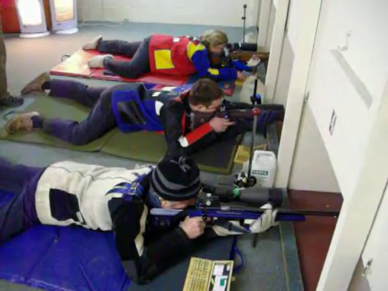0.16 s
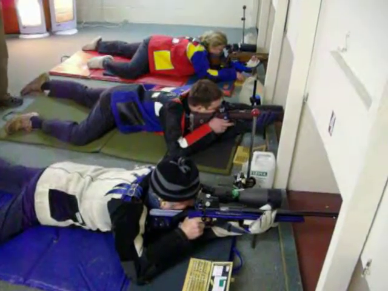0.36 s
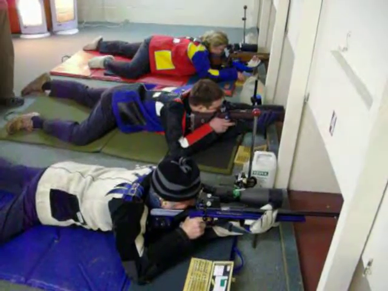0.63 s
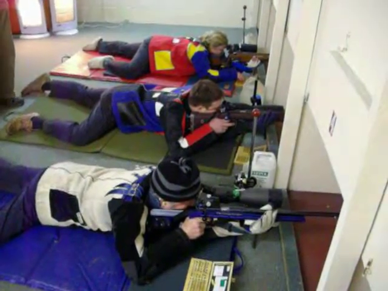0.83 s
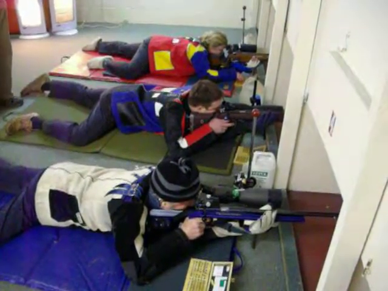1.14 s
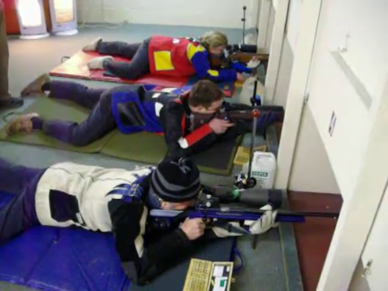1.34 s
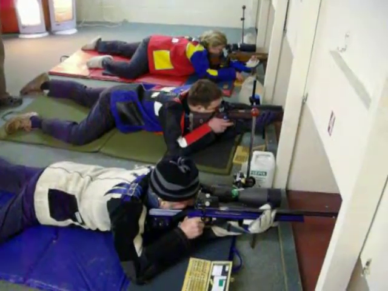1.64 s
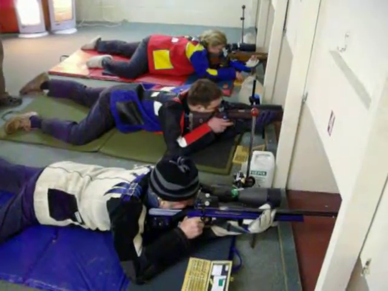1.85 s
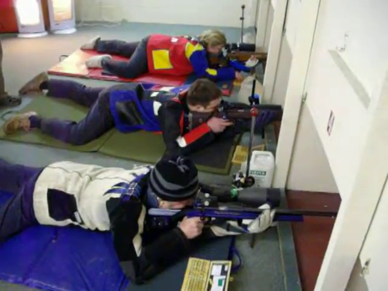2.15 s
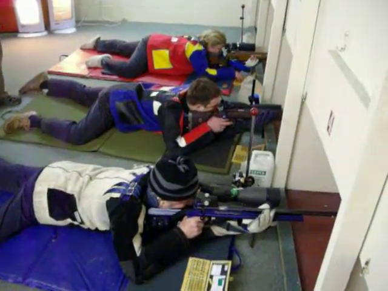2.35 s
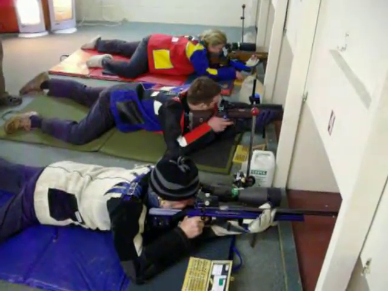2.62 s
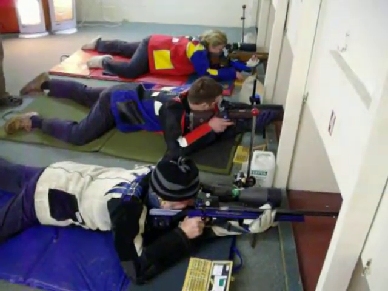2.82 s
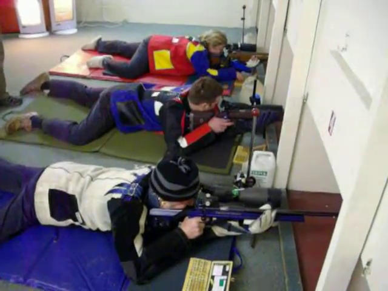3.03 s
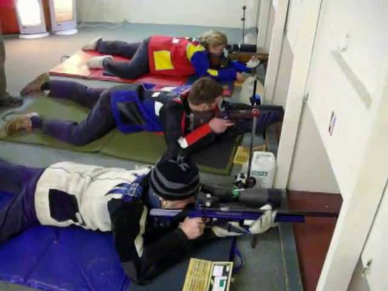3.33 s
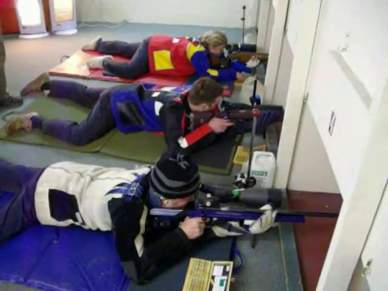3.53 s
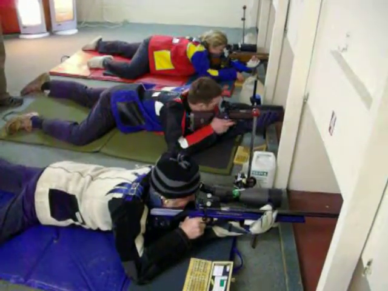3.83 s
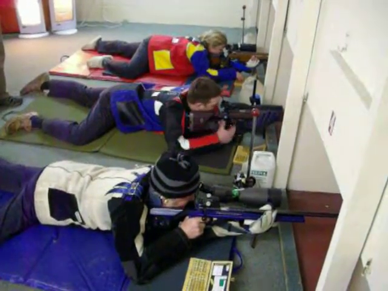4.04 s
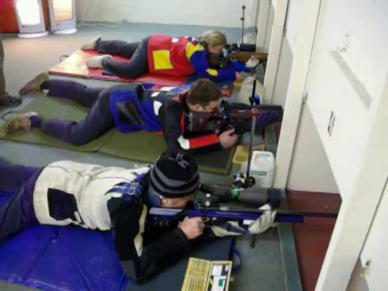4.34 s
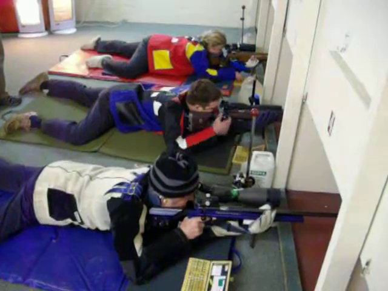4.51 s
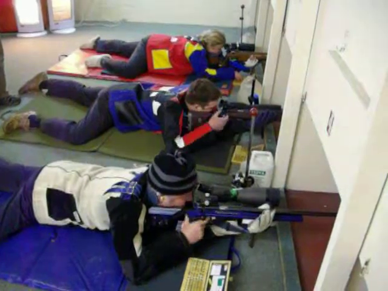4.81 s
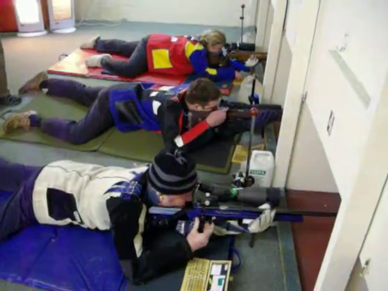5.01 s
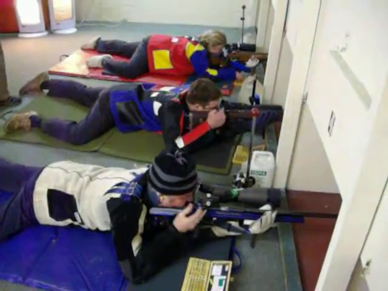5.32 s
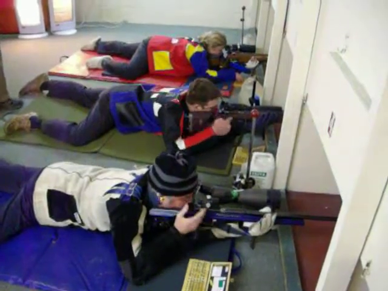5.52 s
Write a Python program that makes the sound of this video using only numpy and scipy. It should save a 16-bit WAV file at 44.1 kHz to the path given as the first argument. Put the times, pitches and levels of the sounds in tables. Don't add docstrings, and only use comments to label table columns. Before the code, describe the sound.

Two small-calibre rifle shots, each a hard crack with a long indoor echo held up by the recorder's automatic level, come roughly two seconds apart. Low ventilation noise, wavering hum and a steady high whine fill the gaps. Near the end, light metal clicks, a short bolt rattle with a dull thump, and a final bright latch snap sound close by, with a short booth reverberation.

```python
import sys
import numpy as np
from scipy import signal
from scipy.fft import rfft, irfft
from scipy.io import wavfile
from scipy.ndimage import uniform_filter1d

SR = 44100
rng = np.random.default_rng(int(sys.argv[2]) if len(sys.argv) > 2 else 0)


def voltage_ratio(decibels):
    exponent = np.asarray(decibels, float) / 20
    return 10 ** exponent


def unload_audio(sound):
    columns = np.transpose(np.atleast_2d(sound))
    steps = np.round(np.clip(columns, -1, 1) * 32767)
    wavfile.write(sys.argv[1], SR, steps.astype(np.int16))


N = 249910

# pitch_hz, level_db (per Hz)
AIR_COLOUR = [(8.8, -42), (15, -4.5), (27, -8), (103, -14.5), (125, -15.5), (201, -20), (281, -19.5),
              (393, -17.5), (550, -23), (650, -23.5), (2630, -28.5), (6600, -29.5), (7180, -27.5),
              (7800, -26.5), (11900, -40), (15400, -78), (22000, -120)]
# time_s, level_db
STIR = [(0, -0.5), (4.9, 0), (5.1, 4.5), (5.4, 5.5), (5.67, -1.5)]

# pitch_hz, fade_s
RANGE_FADE = [(40, 1.14), (100, 0.95), (300, 1.5), (800, 1.9), (1600, 1.95), (2500, 1.83), (4000, 1.48),
              (6500, 1.047), (11000, 0.68)]
BOOTH_FADE = [(200, 0.78), (1000, 1), (3000, 0.76), (6000, 0.54), (11000, 0.47)]
# pitch_hz, level_db (per Hz)
BOOTH_COLOUR = [(200, 20), (500, 3.5), (1000, 5.5), (1600, 2), (3000, 4.5), (4200, 2), (7000, 7),
                (11500, 3.5)]
# delay_s, level_db
BOOTH_ECHOES = [(.014, 2), (.0215, 2), (.033, 2), (.037, 2)]

# start_s, level_db, brightness_db (per part), length_s, room_db
CONTACTS = [
    (4.8335, -31.5, 7.5, 0.0087, -5.5),
    (4.8455, -27.5, -1, 0.0057, -9),
    (5.089, -35, 4, 0.0033, -6),
    (5.128, -27, 9, 0.0062, -20),
    (5.1355, -12.5, 2, .003, -7),
    (5.1803, -11, 2.5, 0.0049, -7.5),
    (5.361, -29, 1, 0.0058, -12),
    (5.393, -21, 3.5, 0.0046, -6.5),
    (5.4131, -4.5, 4, 0.0021, -4.5),
]
# low_hz, high_hz
PART_EDGES = [(550, 1800), (1800, 4000), (4000, 7200), (7200, 10800)]
PART_COLOUR = (-2, 2, -1, -5.5)
# start_s, spring_db
RATTLE = [(5.1352, -9), (5.1438, -9), (5.151, -13), (5.1625, -11), (5.1725, -12)]
# pitch_hz, fade_s, spread (0 to 1, of the split tones)
SPRING = (3150, .035, .05)
CATCH = (9000, .008, .025)
LATCH = (8950, .017, .025)
RECEIVER = (1320, 0.05, 0.025)
# start_s, peak_db
CATCH_STRIKES = [(4.8336, -9)]
LATCH_STRIKES = [(5.3927, -11), (5.4135, -1)]
RECEIVER_STRIKES = [(5.091, -30), (5.363, -29), (5.395, -24), (5.416, -14)]
# pitch_hz, peak_db, fade_s
LIFT_THUMP = [(296, -17, 0.12), (399, -23, 0.13), (652, -31, 0.14)]
DRAW_THUMP = [(308, -23, 0.095), (482, -23, .09), (910, -29, .05)]
STOP_THUMP = [(53, -28, .16), (269, -28, 0.2), (444, -27, 0.27)]

# start_s, tail_db (at TAIL_REFERENCE_S), crack_db, far_echo_s (delay of the far end)
SHOTS = [
    (0.2874, -10, 13, 0.11),
    (2.4847, -15.5, 14, 0.28),
]
# pitch_hz, level_db (per Hz)
FIRST_CRACK = [(120, -45), (200, -13), (771, -20), (1640, -6), (2080, -22), (2590, 2), (3780, 8.5),
               (4260, 1), (7230, -4), (8720, 8), (11900, -11), (15400, -51), (22000, -120)]
SECOND_CRACK = [(120, -39), (200, -16), (1100, 4.5), (2010, -9), (2640, 5), (5310, 2.5), (10500, -6),
                (11900, -23), (15400, -55), (22000, -120)]
# pitch_hz, level_db (per Hz)
FIRST_TAIL = [(18, -62), (30, -21), (97, -12.5), (142, -17.5), (177, -11.5), (211, -15.5), (375, -0.5),
              (533, -5.5), (720, -2), (1910, -1), (2580, -2.5), (7750, -22.5), (11900, -54), (15400, -83),
              (22000, -120)]
SECOND_TAIL = [(18, -38), (30, -8), (217, -13.5), (375, -3.5), (459, -9), (816, -8), (1070, 3.5),
               (1960, -8.5), (2850, 4), (3390, -8.5), (4040, -6.5), (8150, -20.5), (11900, -49.5),
               (15400, -80), (22000, -120)]
# pitch_hz, width_hz, level_db
FIRST_PEAKS = [(365, 56, -3.5), (1124, 530, 3.5), (1930, 290, -2), (2650, 650, 4.5), (3940, 610, 5.5),
               (4770, 400, -0.5), (8830, 2500, 6)]
SECOND_PEAKS = [(397, 68, 3), (690, 410, 1), (1340, 380, -1.5), (3330, 200, -4.5), (3950, 1400, 4.5),
                (4770, 230, -7), (5300, 500, 3.5), (6600, 410, 2.5), (8140, 430, 6.5), (8700, 400, -8),
                (9200, 450, 4)]
# pitch_hz, level_db
FIRST_EARLY = [(50, 1), (150, -1), (300, 6), (550, -8), (1000, -8.5), (1500, 0), (2050, -6), (2800, 1),
               (4000, 0), (5600, -0.5), (8000, 0)]
SECOND_EARLY = [(50, -7), (150, -1.5), (300, 0.5), (700, -2), (1500, -0.5), (3000, -1), (8000, -2)]

TAIL_REFERENCE_S = 0.6
LIFT_S, DRAW_S, STOP_S = 4.8485, 5.137, 5.182


def at_hz(points, hz):
    table = np.array(points)
    return np.interp(np.log(hz + 1e-9), np.log(table[:, 0]), table[:, 1])


def coloured(spectrum, size, peaks=()):
    hz = np.fft.rfftfreq(size, 1 / SR)
    lift_db = sum(db / (1 + (2 * (hz - top_hz) / width) ** 2) for top_hz, width, db in peaks)
    noise = rfft(rng.standard_normal(size)) * voltage_ratio(at_hz(spectrum, hz) + lift_db)
    return hz, noise / np.std(irfft(noise, size))


def drift(rate_hz, size):
    knots = rng.standard_normal(4000)
    return np.interp(np.arange(size) / SR * rate_hz, np.arange(len(knots)), knots)


def dying_noise(spectrum, fades, size, from_s, peaks=(), early=((1, 0),), far_echo_s=0):
    hz, noise = coloured(spectrum, size, peaks)
    t = np.arange(size) / SR
    octave = np.clip(np.log2(hz + 1e-9), 5, 14)
    before_echo = 0.5 - 0.5 * np.tanh((t - far_echo_s) / 0.015)
    out = 0
    for centre in np.arange(5, 14.5, 0.5):
        overlap = np.clip(1 - 2 * abs(octave - centre), 0, 1)
        band = irfft(noise * overlap, size)
        decay_db = -60 * (t - from_s) / at_hz(fades, 2 ** centre)
        out = out + band * voltage_ratio(decay_db + before_echo * at_hz(early, 2 ** centre))
    return out


def ring(hz, fade_s, spread, size):
    t = np.arange(size) / SR
    beating = sum(np.sin(2 * np.pi * hz * (1 + spread * side) * t) for side in (-1, 0, 1.3)) / 2
    rise = 1 - np.exp(-t * hz / 1.2)
    return beating * voltage_ratio(-60 * t / fade_s) * rise


def background():
    t, size = np.arange(N) / SR, 1 << 18
    air = irfft(coloured(AIR_COLOUR, size)[1], size)[:N] * voltage_ratio(-38)
    stir_db = np.interp(t, *np.transpose(STIR))
    hum = voltage_ratio(-42 + stir_db + 2.76 * drift(14, N)) * np.sin(2 * np.pi * 99.3 * t)
    fan = voltage_ratio(-47 + 4.4 * drift(18, N)) * np.sin(2 * np.pi * 58.2 * t)
    whine = voltage_ratio(-36) * np.sin(2 * np.pi * 7089.1 * t)
    return air + hum + fan + whine


def booth_echoes():
    echoes = dying_noise(BOOTH_COLOUR, BOOTH_FADE, 1 << 15, 0)
    t = np.arange(len(echoes)) / SR
    near_db = sum(db * np.exp(-((t - delay) / 0.001) ** 2) for delay, db in BOOTH_ECHOES)
    early_db = 4 * np.exp(-(t / 0.062) ** 4)
    grain_db = 1.5 * drift(1500, len(t))
    build = 1 - np.exp(-(t / 0.0075) ** 1.1)
    return echoes * voltage_ratio(near_db + early_db + grain_db) * build


def struck_parts():
    strikes = [(SPRING, RATTLE), (CATCH, CATCH_STRIKES), (LATCH, LATCH_STRIKES), (RECEIVER, RECEIVER_STRIKES)]
    thumps = [(LIFT_S, LIFT_THUMP), (DRAW_S, DRAW_THUMP), (STOP_S, STOP_THUMP)]
    rings = [(s, db, *part) for part, rows in strikes for s, db in rows]
    thuds = [(s, db, hz, fade_s, 0.06) for s, modes in thumps for hz, db, fade_s in modes]
    return rings + thuds


def bolt():
    direct, to_room, size = np.zeros(N), np.zeros(N), 8192
    t = np.arange(size) / SR
    bands = [signal.butter(2, edges, "band", fs=SR, output="sos") for edges in PART_EDGES]
    # 17 dB under their ring, brightness 2 dB, 3.8 ms long, room -5.5 dB
    rattles = [(s, db - 17, 2, 0.0038, -5.5) for s, db in RATTLE[1:]]
    for s, level_db, brightness_db, length_s, room_db in list(CONTACTS) + rattles:
        parts_db = level_db + np.add(PART_COLOUR, brightness_db * np.linspace(-1.5, 1.5, 4))
        shape = (1 - np.exp(-t / 0.00038)) * (np.exp(-t / length_s) + 1e-9)
        rough = rng.standard_normal((4, size))
        at = round(s * SR)
        for band, db, chatter, sign in zip(bands, parts_db, rough, (1, -1, 1, -1)):
            part = signal.sosfilt(band, chatter)
            direct[at:at + size] += (voltage_ratio(db) * shape * part / part.std())[:N - at]
            blow = sign * signal.sosfilt(band, (t == 0) + 1e-18)
            blow = np.sqrt(length_s * SR) * blow / np.linalg.norm(blow)
            to_room[at:at + size] += (voltage_ratio(db + room_db) * blow)[:N - at]
    for s, peak_db, hz, fade_s, spread in struck_parts():
        at = round(s * SR)
        ringing = ring(hz, fade_s, spread, size)[:N - at]
        direct[at:at + size] += voltage_ratio(peak_db) * ringing
        to_room[at:at + size] += voltage_ratio(peak_db - 17) * ringing
    return direct + voltage_ratio(-30.5) * signal.fftconvolve(to_room, booth_echoes())[:N]


def shots():
    out, size = np.zeros(N), 1 << 17
    t = np.arange(size) / SR
    colours = [(FIRST_CRACK, FIRST_TAIL, FIRST_PEAKS, FIRST_EARLY),
               (SECOND_CRACK, SECOND_TAIL, SECOND_PEAKS, SECOND_EARLY)]
    onset = 1 - np.exp(-(t / 0.0025) ** 2)
    tail_build = 1 - np.exp(-(t / 0.009) ** 2)
    crack_shape = np.exp(-(t / 0.0078) ** 6)
    for (s, tail_db, crack_db, far_echo_s), (crack_colour, tail_colour, peaks, early) in zip(SHOTS, colours):
        tail = dying_noise(tail_colour, RANGE_FADE, size, TAIL_REFERENCE_S, peaks, early, far_echo_s)
        lumps = voltage_ratio(1.95 * drift(497.6, size) * np.exp(-t / 0.25) + 0.28 * drift(250, size))
        tail = voltage_ratio(tail_db) * tail * lumps * tail_build
        crack = irfft(coloured(crack_colour, size)[1], size) * voltage_ratio(crack_db) * crack_shape
        at = round(s * SR)
        out[at:at + size] += ((tail + crack) * onset)[:N - at]
    return out


def scene():
    return (background() + bolt() + shots())[None]


def roll_off(x):
    return signal.sosfilt(signal.butter(12, 15800, fs=SR, output="sos"), x)


def record(dry):
    hold_db, release_db_per_s, attack_s = -13.5, 125, 0.002
    ceiling, peak_hold_db = 0.74, -7.8
    offset_before, offset_after = -0.015, -0.0067
    band_limit = signal.cheby2(10, 50, 12850, fs=SR, output="sos")
    x = signal.sosfilt(band_limit, dry[0])
    smooth = np.exp(-1 / (0.0047 * SR))
    level_db = 10 * np.log10(signal.lfilter([1 - smooth], [1, -smooth], x ** 2) + 1e-12)
    ramp = release_db_per_s * np.arange(N) / SR
    held_db = np.maximum.accumulate(level_db + ramp) - ramp
    over_db = np.maximum(held_db - hold_db, 0)
    lag = np.exp(-1 / (attack_s * SR))
    x = (x + offset_before) * voltage_ratio(-signal.lfilter([1 - lag], [1, -lag], over_db))
    short_level = np.sqrt(abs(uniform_filter1d(x ** 2, size=100)))
    x = x / np.maximum(1, short_level / voltage_ratio(peak_hold_db))
    x = signal.sosfilt(band_limit, np.clip(x, -ceiling, ceiling))
    mix = np.clip(x + offset_after, -ceiling, ceiling)[None]
    return roll_off(mix)


dry = scene()
out = record(dry)
unload_audio(out)
```